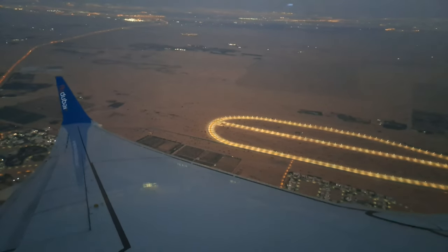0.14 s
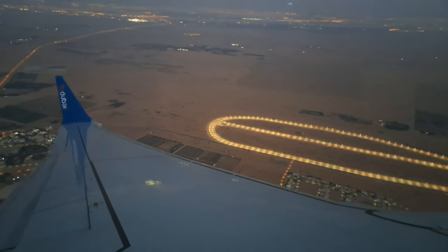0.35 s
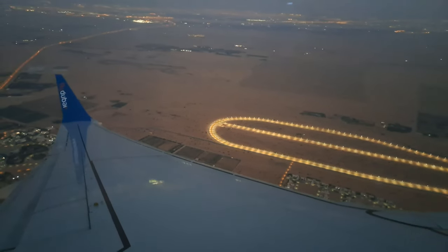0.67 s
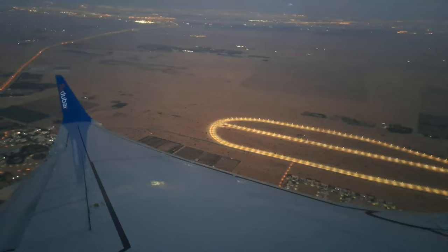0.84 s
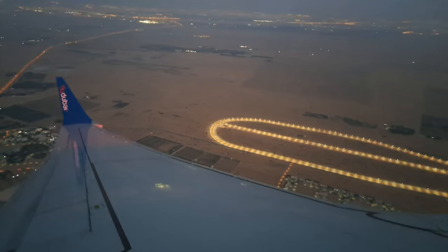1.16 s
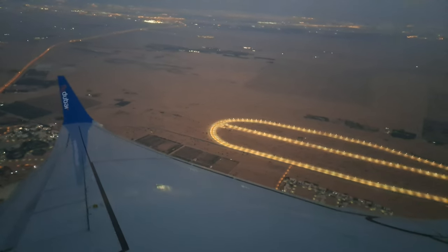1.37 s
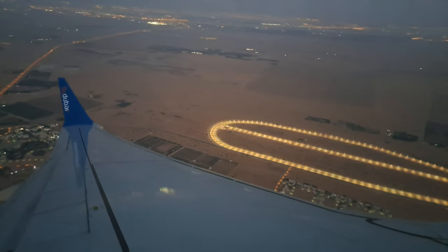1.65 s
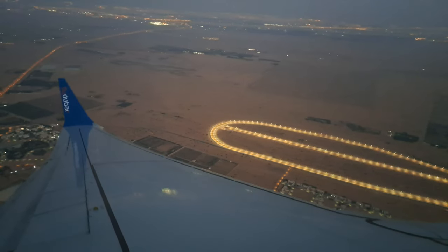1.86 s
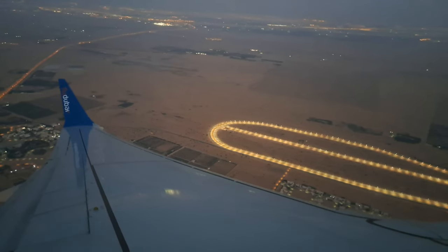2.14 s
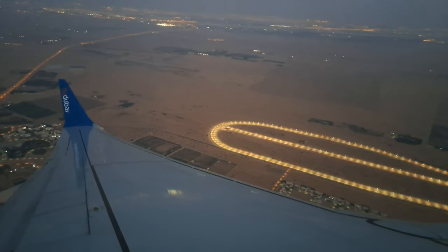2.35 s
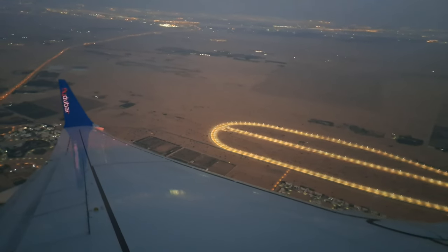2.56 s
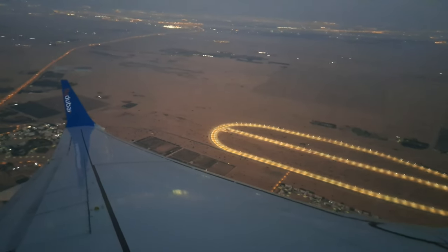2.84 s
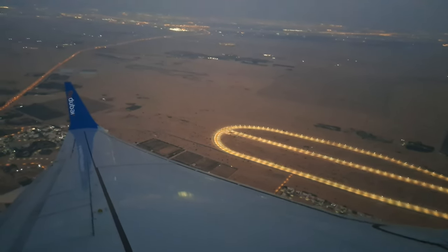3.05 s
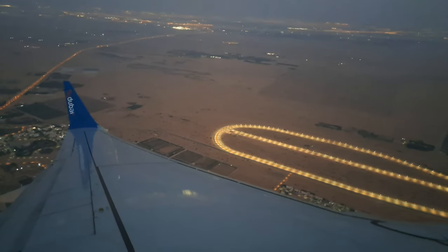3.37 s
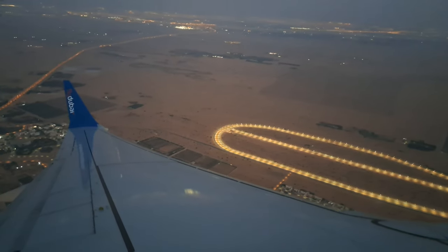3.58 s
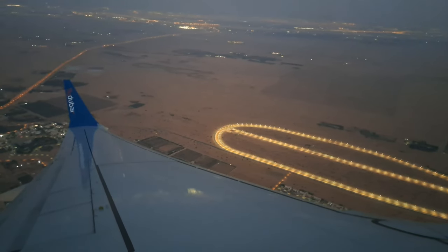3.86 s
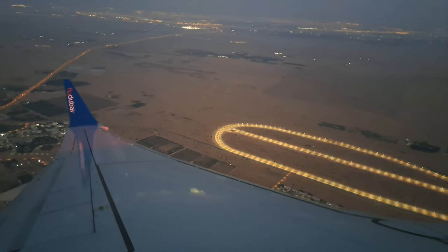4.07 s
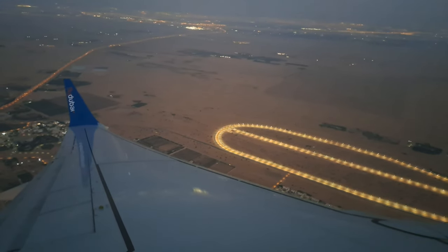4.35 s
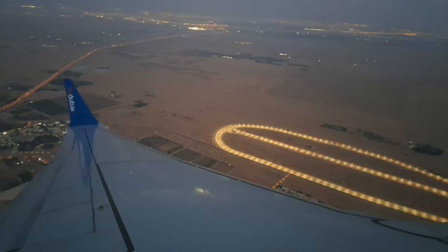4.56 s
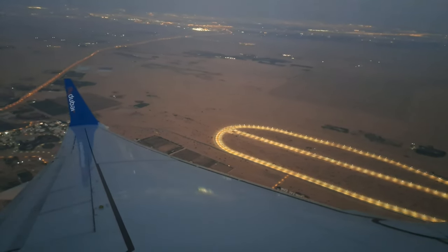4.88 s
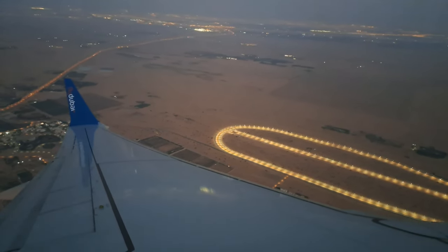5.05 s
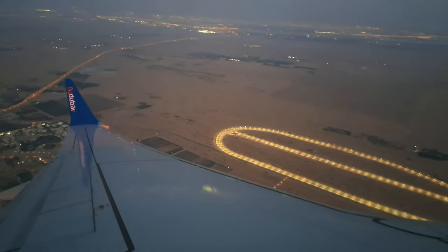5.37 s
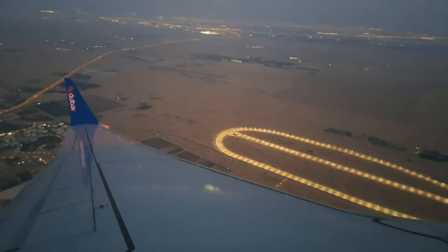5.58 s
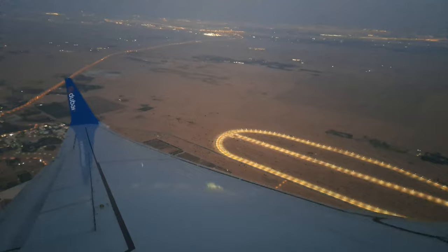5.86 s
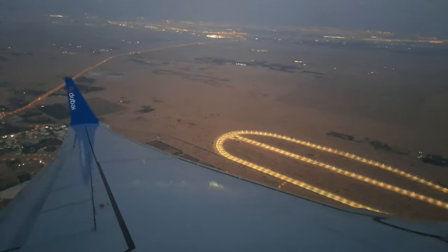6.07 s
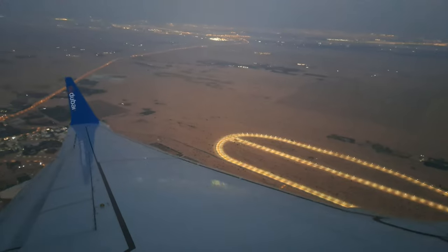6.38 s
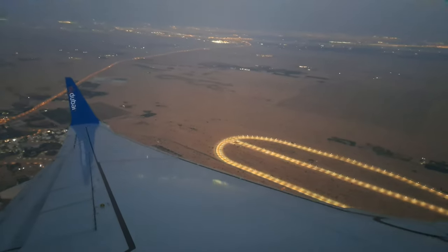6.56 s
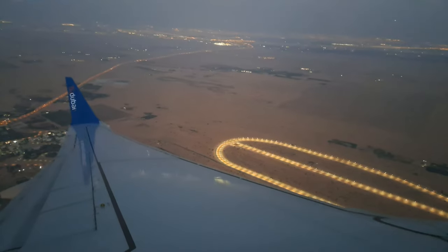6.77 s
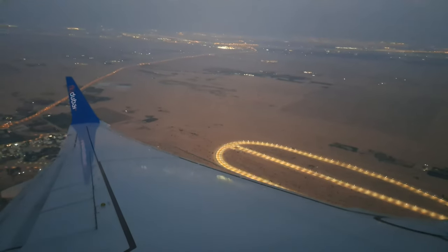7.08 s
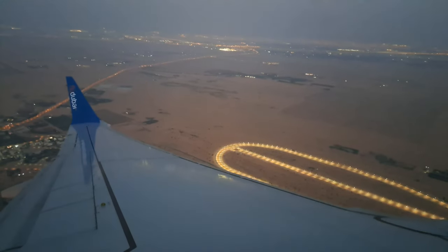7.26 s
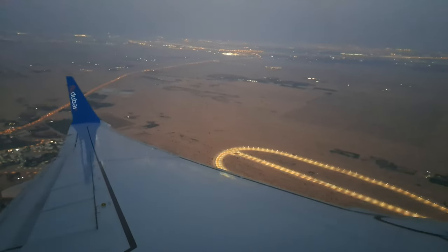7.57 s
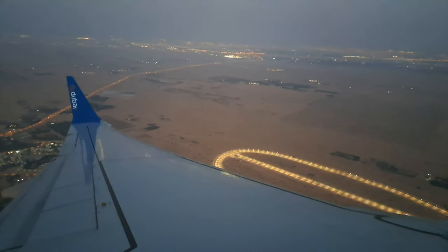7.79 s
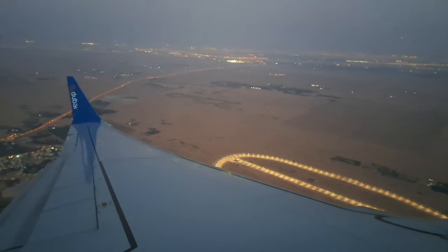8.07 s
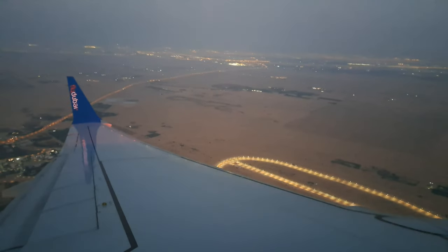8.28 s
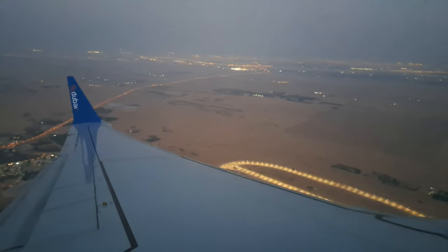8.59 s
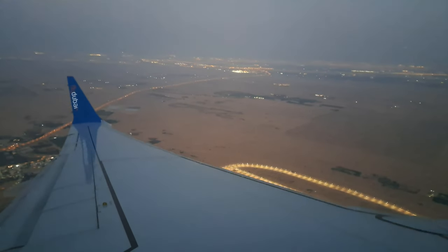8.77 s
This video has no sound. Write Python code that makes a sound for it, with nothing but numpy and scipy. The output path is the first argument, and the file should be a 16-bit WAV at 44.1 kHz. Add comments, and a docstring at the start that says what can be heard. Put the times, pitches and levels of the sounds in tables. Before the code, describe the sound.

A continuous, heavy low rumble of air over the hull fills an airliner cabin, with a steady low engine hum, a slowly beating drone above it and faint thin whines. A few tiny finger ticks come early, a firmer click at about 1.4 seconds, then one sharp loud knock on the right near 2.9. Close handheld stereo microphone at the window; no voices.

```python
"""Turbulent airflow over an airliner's hull rumbles, roars and hisses in the cabin: shaped noise at two ports.
Engines add a hum and a drone beating from port to port; both rise briefly in pitch, then sink. Thin whines,
some in close pairs that beat, are wandering sines; faint air whistles are narrow bands of noise.
Fingers tick and rub on the hand-held case at the window: short bursts ring its resonances, once strongly
at the right port, and grainy noise strokes give faint brushes, a squeak and a swish."""
import sys
import numpy as np
from scipy import signal
from scipy.fft import rfft, irfft, next_fast_len
from scipy.io import wavfile
from scipy.ndimage import uniform_filter1d, minimum_filter1d, map_coordinates

SR = 44100
rng = np.random.default_rng(int(sys.argv[2]) if len(sys.argv) > 2 else 0)


def waveform_to_disk(signal):
    """Save audio, clipped to [-1, 1], as 16-bit WAV at the path in sys.argv[1]."""
    frames = np.transpose(np.atleast_2d(signal))
    scaled = np.clip(frames, -1, 1) * 32767
    samples = np.round(scaled).astype(np.int16)
    wavfile.write(sys.argv[1], SR, samples)


N = 393813

# Slow swell of the airflow: [t/s, level/dB]
FLOW_SWELL = [(0, 0), (2.5, 0.5), (4.4, -1), (5.2, 0.3), (8.2, 0), (8.9, 1.5)]
# Spectral shapes of the three airflow noises before scaling to rms 1: [f/Hz, level/dB per Hz]
RUMBLE_SPECTRUM = [(10, -70), (22, -30), (30, -21), (45, -10), (65, -3.5), (95, 0), (135, 1), (160, -3),
                   (200, -8), (240, -9), (300, -10), (340, -11), (400, -19), (440, -22), (520, -27),
                   (700, -70), (1500, -120)]
ROAR_SPECTRUM = [(350, -42), (520, -2.5), (600, 2), (680, -3), (760, 1), (860, -2.5), (1000, -3),
                 (1200, -8), (1600, -11), (2200, -17), (3200, -20.5), (4000, -26.5), (6000, -64),
                 (8000, -90)]
HISS_SPECTRUM = [(3000, -29), (4000, -1.5), (4600, 1), (5300, -2), (6250, -1.5), (7000, -5.5), (8000, -14),
                 (9000, -17.5), (10500, -17.5), (12000, -18.5), (13000, -22), (15500, -24)]
# Correlation of the airflow noise between the ports: [f/Hz, correlation from -1 to 1]
PORT_CORRELATION = [(40, .995), (90, .97), (150, .9), (330, .84), (430, .45), (500, .19), (630, .49),
                    (760, .45), (900, .32), (1150, 0), (1450, -.45), (1800, -.28), (2500, .16), (5000, 0)]
# Level difference of the airflow noise between the ports: [f/Hz, left-right level/dB]
PORT_LEAN = [(40, 0.5), (170, 0), (300, 2.5), (450, 2), (700, 1.6), (1000, 3.5), (1300, 1.5), (2000, 1.6),
             (3000, 2.5), (4500, 1), (6200, 8.5), (8000, 7.0), (12000, -1.3)]
RUMBLE_DB, ROAR_DB, HISS_DB = -15.5, -36, -57.5  # rms levels before the swell

# Engine hum: [t/s, f/Hz, left level/dB, right level/dB]
ENGINE_HUM = [(0, 266.6, -15.5, -19), (.3, 267, -16.5, -21), (1.1, 269.7, -17, -24), (1.6, 269.6, -17, -24),
              (2.2, 268.8, -16.3, -22.5), (3.9, 268.7, -16, -20.5), (4.7, 267.1, -16.5, -20.5),
              (5.3, 266.5, -16.3, -20), (7.5, 266.2, -17, -21), (8.3, 265.7, -18.5, -24),
              (8.93, 265.4, -17, -22.5)]
# Phase gap between the drones of the two engines: [t/s, gap/turns]
DRONE_SLIP = [(0, -.2), (.25, 0), (.7, .64), (1, .82), (1.15, 1), (1.5, 1.13), (2.7, 1.16), (3.75, 1.67),
              (4.3, 1.9), (5.8, 1.94), (6.8, 2.1), (7.7, 2.45), (8.3, 2.67), (8.93, 2.97)]
# Thin whines, levels before their wander: [f/Hz, left level/dB, right level/dB, left phase lead/rad]
WHINE_LINES = [(1485.8, -53.5, -60, -2), (1493.9, -66.5, -59.5, 3.5), (1761.7, -63.5, -57.5, 2.5),
               (1768.4, -64.5, -62.5, 0), (2145.2, -62, -72, 0.6), (2643.2, -57.5, -64, 0.5),
               (2654, -56.5, -60.5, 1.2), (2971.6, -60.5, -71.5, 2.3), (3524.7, -62, -63, 3.5)]
HUM_LEAD = 0.15  # rad, left before right
DRONE_RATIO = 1.7153  # drone frequency over hum frequency
DRONE_DB = (-27.5, -30)  # left and right level at the fullest point of the beat
DRONE_LEAD = -0.8  # rad, left before right, apart from the sign of the beat
RIGHT_GAP = 0.67  # turns from which the phase gap is taken at the right port

# Air whistles: [f/Hz, width/Hz, level/dB midway between the ports, left-right level/dB]
WHISTLE_BANDS = [(2993, 70, -57, 5), (4400, 40, -73.5, 1), (4660, 44, -73, 7), (1360, 20, -65.5, 4.5),
                 (507, 6.5, -52.5, 0)]

# Ticks on the case, levels of their high modes: [t/s at the end of the rise, left level/dB, right level/dB]
CASE_TICKS = [(.529, -53.5, -59.5), (.5752, -53.5, -64.5), (.634, -52, -55), (.842, -52, -50.5),
              (1.3457, -46, -45), (1.356, -40, -48), (1.3626, -41, -41.5), (1.3753, -25.5, -31),
              (1.3953, -35.5, -50), (2.7957, -51, -45), (2.836, -62.5, -40.5), (2.8712, -59, -6.5),
              (2.8749, -70.5, -20.5), (2.9619, -62, -55)]
# Resonances of the case, five low ones and then the high ones: [f/Hz, width/Hz, level/dB]
CASE_MODES = [(1250, 700, -2), (2200, 800, 0), (3300, 1000, -3), (4700, 1500, -6), (6300, 1500, -9),
              (8400, 1800, -10), (11900, 1500, 0), (14300, 1800, -3)]
LOW_MODES = 5
LOW_DB = (9, 0.5)  # low modes over the high ones, left and right
TICK_RISE_MS = 0.9
FAINT_DB, FAINT_T60_MS = -50, (26, 12)  # a faint tick; its 60 dB decay time before ringing, left and right
DRYING = 0.3  # dB by which the decay time shrinks for each dB above a faint tick

# Skin sliding over the case, levels before the fade: [t/s, length/s, left level/dB, right level/dB]
FINGER_RUBS = [(0, .12, -63, -59.5), (0.42, .012, -60, -63.5), (0.515, .025, -59, -63),
               (0.616, .059, -64, -63.5), (0.789, .03, -68, -64), (0.839, .037, -52, -53),
               (1.347, .067, -55, -59), (2.486, .035, -62, -62.5), (2.807, .037, -75, -49),
               (2.846, .019, -85, -46), (2.889, .23, -84, -69), (3.302, .08, -85, -63.5),
               (4.721, .26, -71, -69.5), (5.239, .19, -64.5, -63.5), (5.636, .23, -64.5, -62),
               (6.748, .2, -70, -65.5), (7.573, .056, -62.5, -64.5)]
# Narrow noise bands: 6 kHz ring of two ticks, one squeak of three partials, a faint swish;
# levels before the fade: [t/s, length/s, f/Hz, left level/dB]
NARROW_STROKES = [(0.526, 0.013, 6300, -45), (0.571, .012, 6000, -46), (.838, .036, 6460, -48),
                  (0.837, .051, 9350, -53), (.841, .041, 12180, -57), (3.52, .2, 5650, -58),
                  (3.722, 0.19, 5450, -63)]
NARROW_WIDTH_HZ, NARROW_PAN_DB = 600, 12  # width of the bell; left over right
LIGHT_DB, LIGHT_HZ = -65, 9600  # a light stroke and the lower edge of its spectrum
REACH_HZ_PER_DB, FIRM_HZ = 420, 3800  # a firmer stroke reaches lower, down to FIRM_HZ
FIDGET_DB, FIDGET_S = -75.5, 0.07  # faintest chance stroke of the resting hand; scale of its length

TOP_HZ = 15850  # upper band limit


def airflow():
    """Turbulent pressure on the hull: a deep rumble, a roar through the wall and the hiss of the vents."""
    rumble = amp(RUMBLE_DB) * rush(RUMBLE_SPECTRUM, patchy_db=0)
    roar = amp(ROAR_DB) * rush(ROAR_SPECTRUM, patchy_db=0.78)
    hiss = amp(HISS_DB) * rush(HISS_SPECTRUM, patchy_db=1.35)
    swell_db, = curves(FLOW_SWELL)
    return amp(swell_db) * (rumble + roar + hiss)


def rush(spectrum, patchy_db):
    """Partial coherence: mixing two independent noises sets how alike the ports are at each frequency."""
    z = signal.stft(rng.standard_normal((2, N)), nperseg=512)[2]
    # Smoothing over frequency, then time, makes patches of random gain
    patches = uniform_filter1d(rng.standard_normal(z.shape[1:]), size=6, axis=0)
    patches = uniform_filter1d(patches, size=14, axis=1)
    pair = signal.istft(z * amp(patchy_db * unit(patches)), nperseg=512)[1][:, :N]

    def mid_side(hz):
        # The cosine of twice this angle is the correlation
        angle = np.arccos(np.clip(along(PORT_CORRELATION, hz), -1, 1)) / 2
        return amp(along(spectrum, hz)) * [np.cos(angle), np.sin(angle)]

    mid, side = filtered(pair, mid_side)
    ports = np.array([mid + side, mid - side])
    return unit(filtered(ports, lambda hz: sides(along(PORT_LEAN, hz))))


def engines():
    """Superposition of tones: a hum, two engines' drones beating as their phases slip, and thin whines."""
    hum_hz, *hum_db = curves(ENGINE_HUM)
    gap, = curves(DRONE_SLIP)
    out = amp(hum_db) * tone(hum_hz, HUM_LEAD, waver=0.064)

    beat = np.sin(np.pi * np.array([gap, RIGHT_GAP - gap]))
    drone = tone(DRONE_RATIO * hum_hz, DRONE_LEAD, waver=0.1)
    out += amp(DRONE_DB)[:, None] * beat * drone

    for hz, left_db, right_db, lead in WHINE_LINES:
        level_db = [[left_db], [right_db]] + 3.2 * wobble(1.4)
        out += amp(level_db) * tone(hz, lead, waver=0.55)
    return out


def tone(hz, lead, waver):
    """Phase modulation: a stereo sine of rms 1 whose phase wanders; lead and waver in rad."""
    phase = 2 * np.pi * np.cumsum(hz * np.ones(N)) / SR
    phase += waver * wobble(6) + rng.uniform(0, 2 * np.pi)
    return np.sqrt(2) * np.sin(phase + np.array([[lead / 2], [-lead / 2]]))


def whistles():
    """Narrow-band noise: air whistles as bands of noise that are uncorrelated at the two ports."""
    out = np.zeros((2, N))
    for hz, width, db, pan_db in WHISTLE_BANDS:
        noise = unit(filtered(rng.standard_normal((2, N)), band(hz, width)))
        out += amp(db) * sides(pan_db)[:, None] * noise
    return out


def ticks():
    """Impulsive excitation: a short burst swells, dies and rings the low and high modes of the case."""
    out = np.zeros((2, N + SR))
    ms = np.arange(SR // 10) / SR * 1000
    for s, left_db, right_db in CASE_TICKS:
        # A harder tick is drier
        hardness_db = max(left_db, right_db) - FAINT_DB
        t60 = np.c_[FAINT_T60_MS].T * amp(-DRYING * hardness_db)
        swell = (ms / TICK_RISE_MS) ** 2
        decay = amp(-60 * (ms - TICK_RISE_MS) / t60)
        shape = np.where(ms < TICK_RISE_MS, swell, decay)
        burst = shape * rng.choice([-1, 1], (2, len(ms)))
        low = same_energy(filtered(burst, ringing(CASE_MODES[:LOW_MODES])), shape)
        high = same_energy(filtered(burst, ringing(CASE_MODES[LOW_MODES:])), shape)
        tick = amp([[left_db], [right_db]]) * (high + amp(LOW_DB)[:, None] * low)
        out[:, round((s - TICK_RISE_MS / 1000) * SR):][:, :len(ms)] += tick
    return out[:, :N]


def ringing(modes):
    """Modal superposition: second-order resonances summed with alternating sign."""
    def response(f):
        total = 0
        for k, (centre, width, db) in enumerate(modes):
            resonance = 1j * f * width / (centre * centre - f * f + 1j * f * width)
            total = total + (-1) ** k * amp(db) * resonance
        return total
    return response


def same_energy(x, shape):
    """Energy scaling: each port of x receives the energy of its envelope."""
    wanted = np.linalg.norm(shape, axis=1, keepdims=True)
    return x * wanted / np.linalg.norm(x, axis=1, keepdims=True)


def rubbing():
    """Sliding friction: bright noise brushes, and narrow bands for the ring of two ticks, a squeak and a swish."""
    out = np.zeros((2, N + SR))
    for s, length, left_db, right_db in FINGER_RUBS + fidgets(count=8):
        firmness_db = max(left_db, right_db) - LIGHT_DB
        low_hz = np.clip(LIGHT_HZ - REACH_HZ_PER_DB * firmness_db, FIRM_HZ, 12000)
        bright = lambda f: (f < TOP_HZ) / (1 + (low_hz / (f + 1)) ** 10)
        add(out, s, length, left_db, right_db, bright, onset=0.25)
    for s, length, hz, db in NARROW_STROKES:
        add(out, s, length, db, db - NARROW_PAN_DB, band(hz, NARROW_WIDTH_HZ), onset=0.15)
    return out[:, :N]


def fidgets(count):
    """Random events: faint strokes at chance moments, as rows like those of FINGER_RUBS."""
    return [(when * N / SR, FIDGET_S * (0.3 + long), FIDGET_DB + 4 * left, FIDGET_DB + 4 * right)
            for when, long, left, right in rng.random((count, 4))]


def add(out, s, length, left_db, right_db, response, onset):
    """Amplitude envelope: grainy filtered noise rises over the onset, a fraction of its length, and fades."""
    u = np.linspace(0, 1, round(length * SR))
    # Each grain holds one random gain for 100 samples
    grain_db = 2.8 * rng.standard_normal(len(u) // 100 + 1).repeat(100)[:len(u)]
    grains = amp(grain_db) * rng.standard_normal((2, len(u)))
    envelope = np.minimum(u / onset, 1) * (1 - u ** 2)
    stroke = unit(filtered(grains, response)) * envelope
    out[:, max(round(s * SR), 0):][:, :len(u)] += amp([[left_db], [right_db]]) * stroke


def band(hz, width):
    """Gaussian band-pass: a bell whose standard deviation is half the width."""
    return lambda f: np.exp(-0.5 * ((f - hz) / width * 2) ** 2)


def filtered(x, response):
    """Convolution theorem: the spectrum of x times a response of frequency."""
    m = next_fast_len(x.shape[-1] + 8192)
    spectrum = rfft(x, m) * response(np.fft.rfftfreq(m, 1 / SR))
    return irfft(spectrum, m)[..., :x.shape[-1]]


def wobble(rate):
    """Spline interpolation: a smooth random curve with rate knots a second."""
    knots = rng.standard_normal(int(N * rate / SR) + 4)
    return map_coordinates(knots, [np.arange(N) * rate / SR])


def curves(rows):
    """Linear interpolation: one value per sample for each column after the time."""
    s, *cols = np.transpose(rows)
    return [np.interp(np.arange(N) / SR, s, c) for c in cols]


def along(points, hz):
    """Logarithmic frequency scale: (f/Hz, value) points interpolated on it."""
    f, v = np.transpose(points)
    return np.interp(np.log(hz + 1), np.log(f + 1), v)


def sides(pan_db):
    """Level difference between ports: the left and right gains that give it."""
    return amp(np.array([pan_db / 2, -pan_db / 2]))


def unit(x):
    """Root-mean-square normalisation: x scaled to rms 1."""
    return x / np.sqrt(np.mean(x ** 2) + 1e-20)


def amp(db):
    """Decibel definition: the amplitude gain of a level in dB."""
    return 10 ** (np.asarray(db) / 20)


def scene():
    """Linear superposition: everything that reaches the two ports."""
    return airflow() + engines() + whistles() + ticks() + rubbing()


def record(dry):
    """Peak limiting: tall bass swells ease the whole level down, then the band limit cuts the top."""
    bass = np.abs(filtered(dry, lambda hz: hz < 600)).max(axis=0)
    needed = np.minimum(1, 0.75 / (bass + 1e-9))
    gain = uniform_filter1d(minimum_filter1d(needed, size=1200), size=1200)
    return filtered(dry * gain, lambda hz: hz < TOP_HZ)


dry = scene()
out = record(dry)
waveform_to_disk(out)
```